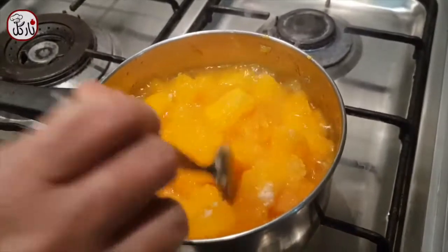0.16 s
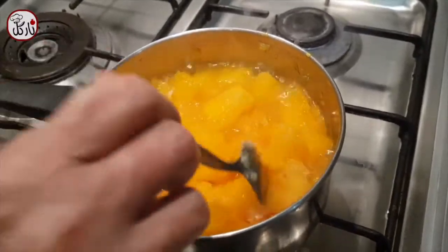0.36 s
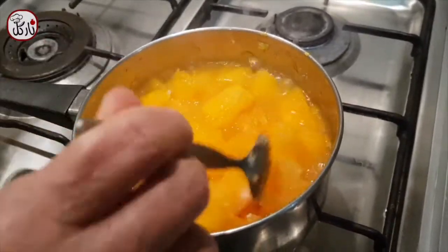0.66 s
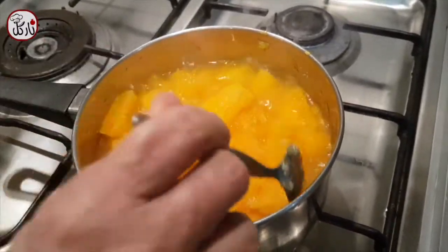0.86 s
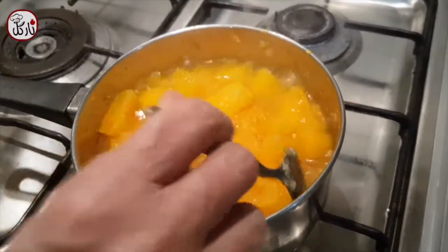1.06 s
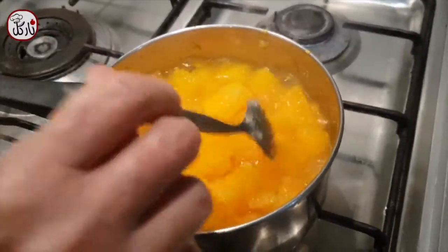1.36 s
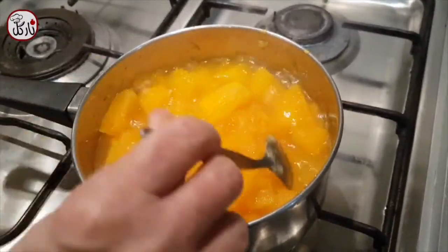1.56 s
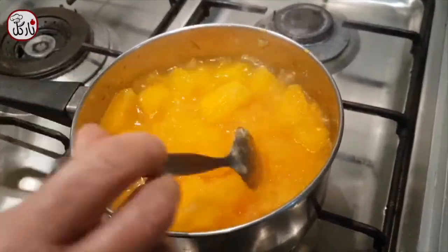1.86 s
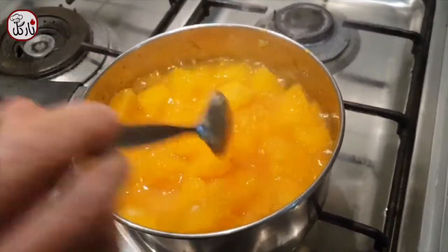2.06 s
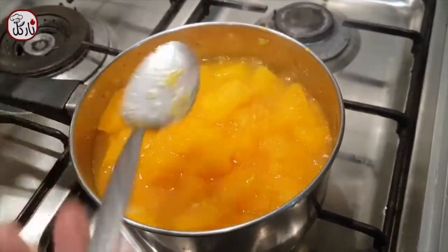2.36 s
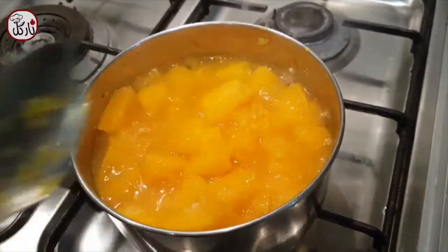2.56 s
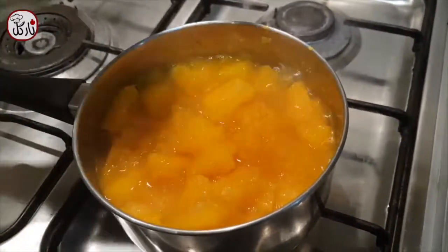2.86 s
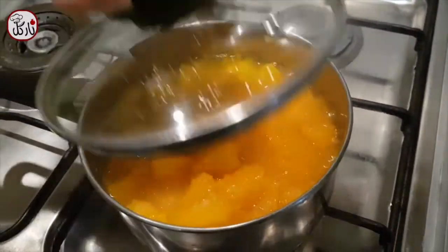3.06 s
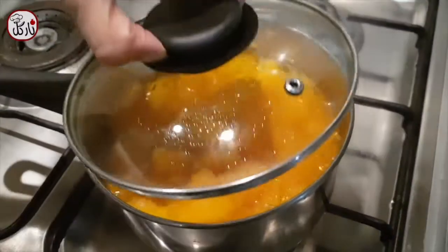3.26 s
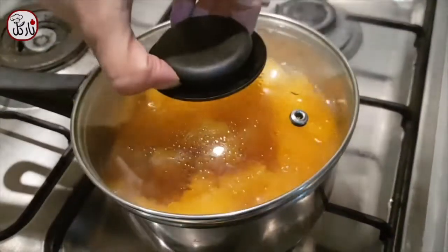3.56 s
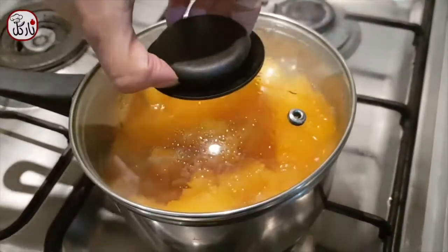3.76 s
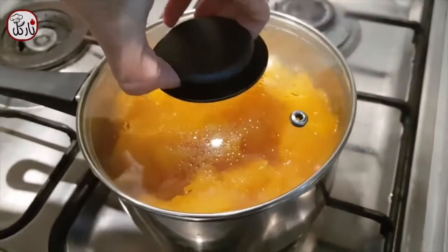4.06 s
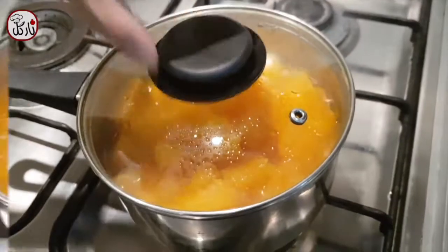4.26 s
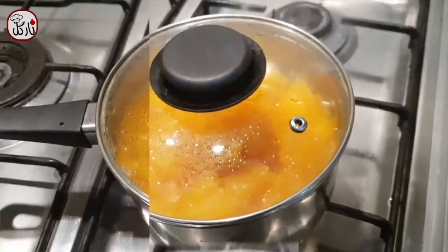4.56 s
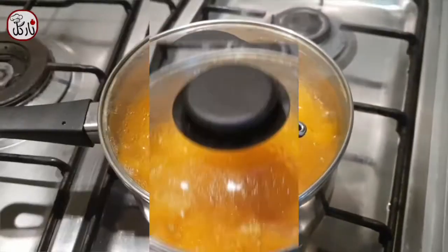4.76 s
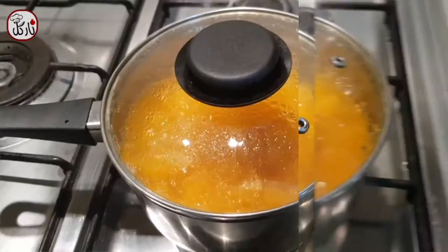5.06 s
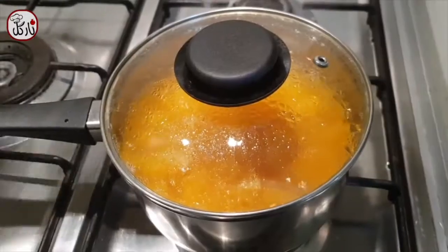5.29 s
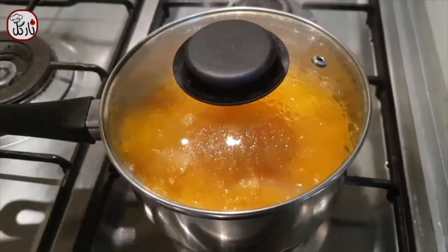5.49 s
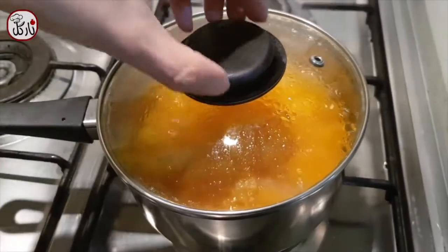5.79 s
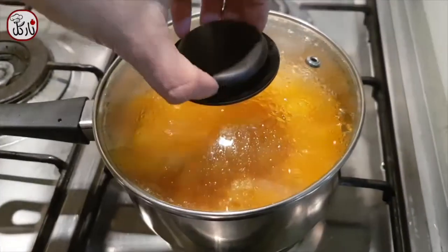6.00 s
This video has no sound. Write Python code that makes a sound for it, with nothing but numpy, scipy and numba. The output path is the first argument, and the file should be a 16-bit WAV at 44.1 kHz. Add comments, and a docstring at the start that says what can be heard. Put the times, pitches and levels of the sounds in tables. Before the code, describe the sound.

Close to a steel pot on a stove, syrup with pumpkin simmers briskly: hollow wet pops, bright spits and fine fizz ring between the metal walls. After three seconds a glass lid comes down, the pot's hollow tone slides lower, and the lid clatters onto the rim and rocks briefly. The boil is then muffled, leaving a low beating motor hum, soft room noise and small ticks under the glass.

```python
"""Bubbles pop, spit and fizz in an open steel pot of simmering syrup with pumpkin; the air in the pot rings along.
A glass lid comes down and this ring sinks in pitch; the lid lands in several touches, rocks and muffles the boil.
Two motors hum and beat over soft room noise; at 4.62 s both dip briefly, then go on with more weight on the left.
Each bubble is a click ringing a short resonance, with a spray of smaller clicks; the lid is struck resonances."""
import sys
import numpy as np
from scipy import signal
from scipy.io import wavfile
from numba import njit

SR = 44100
rng = np.random.default_rng(int(sys.argv[2]) if len(sys.argv) > 2 else 0)


def dump_mix(stems):
    """Bounce the given channels to the path in sys.argv[1] as a 16-bit WAV at rate SR."""
    frames = np.atleast_2d(stems).T  # one column per channel
    limited = np.clip(frames, -1, 1)  # hard clip at full scale
    pcm = np.round(limited * 32767).astype(np.int16)
    wavfile.write(sys.argv[1], SR, pcm)


N = 270465

# Levels are those before the gains, echoes and resonances that follow. Balance is left over right.
COVER_S, COVERED_S, SHUT_S = 3.23, 3.86, 3.88   # the lid begins to cover the pot, covers it, and is shut
LID_NEAR_S = (3.05, 3.22)   # the lid comes near enough to change the ring of the air
SHIFT_S = 4.62   # the background dips and then weighs more on the left
SIDE_LAG = 16   # samples by which high bursts reach the right side later


def amp(db):
    """Turns dB into gain."""
    return 10 ** (np.asarray(db) / 20)


def rms_one(x):
    """Scales a sound to rms 1."""
    return x / np.sqrt(np.mean(x ** 2) + 1e-20)


def in_time(rows):
    """Draws straight lines between table rows: one value per sample for each column."""
    s, *columns = np.transpose(rows)
    return [np.interp(np.arange(N) / SR, s, column) for column in columns]


def at_hz(points, hz):
    """Reads a spectrum table at a frequency, on a log axis."""
    points = np.array(points)
    return np.interp(np.log(hz), np.log(points[:, 0] + 1), points[:, 1])


def sides(pan_db):
    """Left and right gains for a balance in dB."""
    return amp(np.array([pan_db / 2, -pan_db / 2]))


def ramp(start_s, end_s):
    """Rises from 0 to 1 between two moments."""
    return np.clip((np.arange(N) / SR - start_s) / (end_s - start_s), 0, 1)


def butter(x, order, hz, kind="low"):
    """Keeps the part of a sound below, above or between the given frequencies."""
    return signal.sosfilt(signal.butter(order, hz, kind, fs=SR, output="sos"), x)


def drift(cut_hz):
    """Slow random wandering of spread 1: noise smoothed twice, computed at every 40th sample."""
    r = np.exp(-80 * np.pi * cut_hz / SR)
    noise = rng.standard_normal(N // 40 + 2002)
    slow = signal.lfilter([1], [1, -2 * r, r * r], noise)[2000:]
    return np.interp(np.arange(N) / 40, np.arange(len(slow)), rms_one(slow))


def resonate(x, hz, width_hz):
    """A resonance with gain 1 at its peak; the narrower, the longer it rings."""
    r = np.exp(-np.pi * width_hz / SR)
    feedback = [1, -2 * r * np.cos(2 * np.pi * hz / SR), r * r]
    return signal.lfilter((1 - r * r) / 2 * np.array([1, 0, -1]), feedback, x + 1e-18)


def steep(x, hz, width_hz):
    """A resonance passed twice, so that less is left on either side of its pitch."""
    return resonate(resonate(x, hz, width_hz), hz, width_hz)


@njit
def sweep(x, hz, r, rate):
    """A resonance whose pitch moves from sample to sample."""
    y = np.zeros(len(x))
    for i in range(2, len(x)):
        y[i] = x[i] - x[i - 2] + 2 * r * np.cos(2 * np.pi * hz[i] / rate) * y[i - 1] - r * r * y[i - 2]
    return y


def grains(per_s, spread_db, size):
    """Random clicks of uneven size and sign."""
    heights = amp(spread_db * np.minimum(rng.exponential(1, size), 4)) * rng.choice([-1, 1], size)
    return heights * (rng.random(size) < per_s / SR)


# How alike left and right are: f/Hz, likeness (0-1)
SIDE_LIKENESS = [(60, 1), (400, 0.88), (800, 0.17), (1500, 0.043), (5000, 0.064)]


def banded(source, spectrum, balance, patchy_db):
    """Colours noise in third-octave bands, each with its own level, flicker, balance and likeness of sides."""
    out, edges = 0, 25 * 2 ** np.arange(0, 9.4, 1 / 3)
    for k, (low, high) in enumerate(zip(edges, edges[1:])):
        hz = np.sqrt(low * high)
        if hz > spectrum[0][0]:
            mid, side = butter(source[k % 2], 2, [low, high], "band")
            alike = np.clip(at_hz(SIDE_LIKENESS, hz), 0, 1)
            pair = np.sqrt(1 + alike) * mid + np.sqrt(1 - alike) * side * [[1], [-1]]
            level = amp(at_hz(spectrum, hz) + patchy_db * drift(6.6))
            out = out + level * sides(at_hz(balance, hz))[:, None] * pair
    return out


def walls(x, wet_db, t60):
    """Dense echoes between the steel walls, the same on both sides in the bass, different in the treble."""
    noise = rng.standard_normal((3, 5000))
    low, high = (butter(noise, 2, 756, kind) for kind in ("low", "high"))
    tail = (low[2] + high[:2]) * amp(-60 * np.arange(5000) / SR / t60)
    tail = tail / np.sqrt(np.sum(tail[0] ** 2))
    return x + amp(wet_db) * signal.fftconvolve(x, tail, axes=1)[:, :N]


# Further tones of the pot's air under the nearing lid: f at first/Hz, share of the moving tone's fall,
# width/Hz, level/dB
AIR_UNDER_LID = [(1795, 0.44, 92, 13), (2510, 0.18, 38, 4.5), (3560, 1, 110, 1.5)]


def sinking_modes(x):
    """Further air tones fall with the moving tone, each by its share, while that is below 900 Hz."""
    fall_hz, out = np.minimum(in_time(AIR_PITCH)[0] - 900, 0), 0
    for hz, share, width_hz, db in AIR_UNDER_LID:
        r = np.exp(-np.pi * width_hz / SR)
        rings = np.array([sweep(side + 1e-18, hz + share * fall_hz, r, SR) for side in x])
        out = out + amp(db) * (1 - r * r) / 2 * rings
    return out


def wake(events):
    """Gain of the froth: each burst stirs it up for a moment; average 1 until the lid begins to cover the pot."""
    fade_s, share = 0.019, 0.4   # share of the froth that comes with the bursts
    s, db = np.transpose(events)[:2]
    starts = np.zeros(N)
    starts[(s * SR).astype(int)] = np.sqrt(amp(db))
    stirred = signal.lfilter([1], [1, -np.exp(-1 / (fade_s * SR))], starts + 1e-18)
    return 1 - share + share * stirred / stirred[:round(COVER_S * SR)].mean()


def droplets(spray_s, spray_db, per_s, length):
    """Four streams of droplet clicks, left and right, that set in after a moment and fade."""
    rise_s, share_alike = 0.00038, 0.2   # droplets take a moment to fly; share heard alike on both sides
    t = np.arange(length) / SR
    fade = amp(spray_db) * np.exp(-t / spray_s) * (1 - np.exp(-t / rise_s))
    spray = fade * grains(per_s, 3.4, (4, 2, length))
    energy = np.sum(spray ** 2, axis=-1, keepdims=True) + 1e-12
    usual = np.sqrt(1.6 * per_s * spray_s / energy) * amp(spray_db)
    spray = spray * np.clip(usual, .4, 1.6)   # evens out chance differences in strength
    spray[:, 1] = share_alike * np.roll(spray[:, 0], SIDE_LAG, axis=1) + (1 - share_alike) * spray[:, 1]
    return spray


def peak_one(x):
    """Scales a ring so that its first 150 samples peak at 1."""
    return x / np.abs(x[:, :150]).max()


# Fixed tones of the air in the open pot: f/Hz, width/Hz, level/dB
OPEN_POT_AIR = [(837, 57, 4.5), (1110, 127, 2), (1550, 52, 1), (1795, 260, 2), (2266, 43, -1.5),
                (2926, 47, 6.5), (3416, 175, 2.5), (4300, 200, 0.5)]


def bursts(events, spray_db, ring_db, snap_db, air_db, cycles, wet_damps, drops_per_s, drop_cycles):
    """A film snaps, its hollow rings a few cycles, droplets ring around that pitch, and the pot's air answers."""
    length = 5000
    out = np.zeros((2, N + length))
    for s, db, hz, pan_db, spray_s in events:
        spray_s = max(spray_s, .002)
        alike, *drops = droplets(spray_s, spray_db, drops_per_s, length)
        click = np.zeros((2, length))
        # the right side comes later: 9 samples for low bursts, 16 for high ones
        click[[0, 1], [0, 9 if hz < 1300 else SIDE_LAG]] = 1
        # longer spray means a wetter burst, which rings fewer cycles
        width_hz = hz / np.clip(cycles * (.01 / spray_s) ** wet_damps, .8, 12)
        ring = resonate(steep(click, hz, width_hz), hz, 2.95 * width_hz)
        snap_hz = min(hz * 1.24, 13000)   # the broad snap usually lies above the ring
        sound = amp(ring_db) * peak_one(ring) + amp(snap_db) * peak_one(steep(click, snap_hz, snap_hz))
        sound += steep(alike, hz, 1.18 * width_hz) / np.abs(ring).max() * amp(-3.0)
        for drop, ratio in zip(drops, (0.626, 1.3, 2.32)):
            drop_hz = min(hz * ratio * rng.uniform(0.78, 1.17), 11500)
            sound += amp(10.0) * steep(drop, drop_hz, drop_hz / drop_cycles)
        start = round(s * SR)
        out[:, start:start + length] += amp(db) * sides(pan_db)[:, None] * sound
    out, near = out[:, :N], ramp(*LID_NEAR_S)
    open_air = sum(amp(db) * resonate(out * (1 - near), hz, width_hz) for hz, width_hz, db in OPEN_POT_AIR)
    return out + amp(air_db) * (open_air + sinking_modes(out * near))


def bubbles(low_hz, high_hz, per_s, cycles, tilt_db, clump_db, alike):
    """Random bursts dealt to ten pitches, in clumps; part of each reaches both sides alike."""
    out = 0
    for hz, db in zip(np.geomspace(low_hz, high_hz, 10), np.linspace(0, tilt_db, 10)):
        clicks = grains(per_s / 10, 4.5, (2, N)) * amp(clump_db * drift(15))
        clicks[1] = alike * np.roll(clicks[0], 9) + (1 - alike) * clicks[1]
        out = out + amp(db) * rms_one(steep(clicks, hz, hz / cycles))
    return rms_one(out * amp(clump_db * drift(17.8)))


# Colour of the flame and room noise: f/Hz, level per Hz/dB
ROOM_SPECTRUM = [(15, -65), (25, -17.5), (64, -16), (141, -3.5), (194, -12), (269, -8), (710, -21.5),
                 (769, -22.5), (981, -21), (1870, -27), (2660, -45), (7420, -44), (8730, -46.5),
                 (10300, -55), (15800, -89)]
# Extra balance of that noise: f/Hz, level left over right/dB
ROOM_SIDES = [(60, -1.5), (600, -4.5), (1500, -6.5), (3000, -26.5), (6000, -7.5), (12000, 15)]


def room():
    """The flame and the kitchen: soft noise, strongest in the bass, with two resonances of the pot."""
    pan_db = 4.5 + (10 - 4.5) * ramp(SHIFT_S - .3, SHIFT_S)
    noise = rms_one(banded(rng.standard_normal((2, 2, N)), ROOM_SPECTRUM, ROOM_SIDES, patchy_db=1.2))
    body = sum(amp(db) * rms_one(resonate(rng.standard_normal(N), hz, width_hz))
               for hz, width_hz, db in POT_BODY[:2])
    return amp(-56) * sides(pan_db) * (noise + amp(-10.5) * body)


def hum():
    """Tones at 2 and 3 times one motor's speed; the other motor's tone beats with the third ten times a second."""
    motor_hz, other_hz = 44.83, 144.65
    in_step_s = (.011, 5.406)   # moments when all tones start a cycle together, before and after the dip
    shifted = ramp(SHIFT_S - .05, SHIFT_S + .05)
    before_after = np.array([1 - shifted, shifted])
    t = np.arange(N) / SR - np.array(in_step_s)[:, None]
    out = 0
    for db, hz in ((-57, 2 * motor_hz), (-56.5, 3 * motor_hz), (-55, other_hz)):
        tone = np.sum(before_after * np.sin(2 * np.pi * hz * t), axis=0)
        out = out + np.sqrt(2) * amp(db + 0.15 * drift(9.6)) * tone
    return sides(1.5 + (7 - 1.5) * shifted) * out


# Gain of the background, with a brief dip at 4.62 s: t/s, level/dB
BACKGROUND_LEVEL = [(0, -3.5), (1.3, 0.5), (2.2, -2), (3.5, 1.5), (4.0, -5.5), (4.35, -4.5), (4.62, -10),
                    (4.9, -4.5), (5.15, -3.5), (5.6, -4), (6.13, -4)]


def background():
    """Hum and room noise; at 4.62 s they dip briefly, then go on with more weight on the left."""
    level_db, = in_time(BACKGROUND_LEVEL)
    return amp(level_db) * (hum() + room())


# Bands of the faint hiss: f/Hz, width/Hz, level/dB
HISS_BANDS = [(7400, 900, 0), (10400, 1000, 1), (13000, 3000, -5), (5200, 1800, -4)]


def hiss():
    """A faint, sputtering hiss of dense clicks in four bands, mostly on the left."""
    bands = 0
    for hz, width_hz, db in HISS_BANDS:
        band = rms_one(steep(grains(3100, 2.8, (2, N)), hz, width_hz))
        bands = bands + amp(db + 2.0 * drift(47)) * band
    return ramp(4.0, 4.6) ** 2 * amp(-92 + 4.3 * drift(21.0)) * sides(13.0)[:, None] * bands


# Drops ticking against the shut lid: t/s, level/dB, f/Hz, level left over right/dB, spray fade/s
LID_TICKS = [(4.4962, -61, 7640, 4.5, 0.0046), (4.6019, -69.5, 3520, 9, 0.0057),
             (4.6269, -63.5, 7300, 21, 0.0091), (4.7047, -66.5, 6100, 20, 0.0058),
             (4.8758, -51, 7700, 21.5, 0.0069), (5.0559, -60, 7500, 14, 0.0037),
             (5.1557, -67, 4220, 12, 0.0058), (5.3063, -63, 8240, 22, 0.004),
             (5.3856, -54.5, 4870, 7, 0.008), (5.4101, -56.5, 5440, 7, 0.03),
             (5.5428, -63.5, 7000, 14, 0.0079), (5.6705, -62, 7500, 16, 0.0054),
             (5.7309, -61, 7600, 14, 0.006), (5.7664, -57, 7140, 26, 0.0044),
             (5.9, -57.5, 7350, 18, 0.0069), (5.9873, -60, 4630, 9, 0.0067), (6.0272, -55, 6800, 21, 0.011)]
# Bubbles muffled under the shut lid: t/s, level/dB, f/Hz, level left over right/dB, spray fade/s
MUFFLED_BUBBLES = [(4.6014, -68, 1510, 3, 0.0028), (4.6702, -65, 1880, 6, 0.0043),
                   (4.8558, -61, 1740, 12, .004), (4.893, -66, 3500, 7, 0.012),
                   (4.9281, -64, 1700, 7, .004), (4.929, -61, 4960, 10, .003), (4.982, -67, 2200, -3, .003),
                   (5.046, -67, 1170, 10, .004), (5.198, -62.5, 5040, 10, .008),
                   (5.7657, -65, 1800, 7, .003), (5.8605, -60.5, 2120, 21, 0.011),
                   (5.9314, -56, 3050, 7, 0.0067), (5.9862, -61, 2130, 9, 0.0036)]


def under_lid():
    """Drops tick on the glass and single bubbles burst below; the lid dulls both."""
    out = bursts(LID_TICKS, spray_db=-4.5, ring_db=-1.0, snap_db=-13.0, air_db=-24,
                 cycles=2.9, wet_damps=1.0, drops_per_s=800, drop_cycles=2.3)
    out += bursts(MUFFLED_BUBBLES, spray_db=-2.5, ring_db=-4.0, snap_db=-22.0, air_db=-28,
                  cycles=7.2, wet_damps=0.094, drops_per_s=500, drop_cycles=2.0)
    return butter(out, 2, 7400)


# The hand lets go and the lid rocks: t/s, level/dB, softness (0-1)
ROCKING_TOUCHES = [(4.2312, -36.5, 0), (4.246, -37, 0.65), (4.2527, -34, .8), (4.262, -41, 0.68),
                   (4.2822, -33, 0.63), (4.3042, -21, 0.85), (4.324, -30, 0.85), (4.351, -37, 0.84),
                   (4.371, -46, 0.84)]
# Tones of the seated lid: f/Hz, width/Hz, level/dB
SEATED_LID = [(1924, 69, 5), (2203, 140, 8.5), (2340, 104, 8), (3890, 75, -2), (4600, 70, -4),
              (7400, 130, -19), (11300, 490, -7)]


def rocking():
    """Each touch is a click and a short chatter that rings the seated lid; soft touches are duller."""
    touch = np.zeros((2, N))
    for s, db, soft in ROCKING_TOUCHES:
        start = round(s * SR)
        chatter = amp(-20) * np.exp(-np.arange(2000) / SR / .012) * grains(1800, 2.5, (2, 2000))
        chatter[:, 0] += 1
        dulled = signal.lfilter([(1 - soft) ** 2], [1, -2 * soft, soft ** 2], chatter)
        touch[:, start:start + 2000] += amp(db) * dulled
    rings = sum(amp(db) * resonate(resonate(touch, hz, width_hz), hz, 2.4 * width_hz)
                for hz, width_hz, db in SEATED_LID)
    return amp(23.5) * sides(9.1)[:, None] * rings


# A very faint onset (first row), then the touches of the lid landing on the rim from 3.8756 s:
# t/s, click level/dB, clatter level/dB, clatter treble level/dB, thud level/dB
LANDING_ONSETS = [(3.867, -43, -52, -50.5, -66.5), (3.8756, -35.5, -28, -42.5, -47.5),
                  (3.9018, -26, -27, -38, -33.5), (3.911, -32, -37, -43, -43),
                  (3.9169, -24.5, -26.5, -40.5, -31.5), (3.9278, -11.5, -25, -52.5, -34.5),
                  (3.9315, -12, -32, -35, -33.5), (3.937, -23.5, -28.5, -50.5, -44.5),
                  (3.944, -28, -35, -51, -34.5), (3.957, -24, -37, -44.5, -48.5)]


def after_onsets(levels_db, tail_t60):
    """Loudness curve: each onset rises fast, dies fast and leaves a slower tail; powers add."""
    attack_s, onset_t60, tail_db = 0.0034, 0.033, -4   # t60: seconds to fall by 60 dB
    age = np.maximum(np.arange(N) / SR - np.array(LANDING_ONSETS)[:, :1], 0)
    fades = amp(-60 * age / onset_t60) + amp(tail_db - 60 * age / tail_t60)
    shape = (1 - np.exp(-age / attack_s)) * fades
    return np.sqrt(np.sum((amp(levels_db)[:, None] * shape) ** 2, axis=0))


# Tones of the lid and rim: f/Hz, width/Hz (knocks widen it), level/dB
LID_RIM = [(916, 45, -2.5), (1208, 110, 0), (1555, 62, -3), (1973, 36, 3), (2105, 45, 0.5),
           (3480, 47, -7.5), (4070, 58, -1.5), (4430, 62, 4), (4450, 240, -2.5), (5830, 62, -16),
           (7200, 110, -25.5), (10540, 270, -10), (11100, 190, -22)]


def knocks():
    """The click at each onset of the landing rings the lid briefly."""
    click = np.zeros((2, N))
    for s, db, *_ in LANDING_ONSETS:
        click[[0, 1], round(s * SR) + np.array([0, 12])] = amp(db)
    click = signal.lfilter([.4], [1, -.6], click)   # rim on rim is not quite sharp
    return amp(17.0) * sum(amp(db) * resonate(click, hz, 3.2 * width_hz) for hz, width_hz, db in LID_RIM)


# Colour of the broad clatter: f/Hz, level per Hz/dB
CLATTER_SPECTRUM = [(290, -50), (500, -0.5), (781, -12), (1220, 7.5), (1370, -7), (2160, 3.5), (3010, -6),
                    (4440, -2.5), (5510, -11), (10700, -14.5), (15500, -41)]
# Low tones of the pot's body (the room noise uses the first two): f/Hz, width/Hz, level/dB
POT_BODY = [(241, 48, 5), (274.5, 8.6, 3), (151, 74, -5), (349, 150, 0)]


def landing():
    """Dense contacts along the rim ring the lid, clatter, and thud in the pot's body; the treble dies first."""
    clatter_db, treble_db, thud_db = np.transpose(LANDING_ONSETS)[2:]
    part = slice(round(3.8 * SR), round(4.3 * SR))
    length = part.stop - part.start

    def level(x):
        """Scales to rms 1 within the landing."""
        return x / np.sqrt(np.mean(x[..., part] ** 2))

    contacts = np.zeros((2, 2, N))
    contacts[..., part] = grains(1600, 3.8, (2, 2, length))
    grinding = np.zeros(N)
    grinding[part] = grains(4000, 2.5, length)
    rings = sum(amp(db) * rms_one(resonate(contacts[0], hz, width_hz)) for hz, width_hz, db in LID_RIM)
    balance = [(500, 5.5), (2000, 0.5), (5000, 0.5), (10000, 8.8)]   # f/Hz, level left over right/dB
    broad = banded(contacts, CLATTER_SPECTRUM, balance, patchy_db=1.5)
    clatter = 0.54 * sides(-16)[:, None] * level(rings) + 0.9 * level(broad)
    low, high = (level(butter(clatter, 6, 5300, kind)) for kind in ("low", "high"))
    thud = sum(amp(db) * rms_one(resonate(grinding, hz, width_hz)) for hz, width_hz, db in POT_BODY)
    return (after_onsets(clatter_db, tail_t60=0.26) * low
            + after_onsets(treble_db, tail_t60=0.16) * high
            + after_onsets(thud_db, tail_t60=0.19) * level(thud))


# Moving tone of the air in the pot; it wanders around 1 kHz, then sinks as the lid closes: t/s, f/Hz, level/dB
AIR_PITCH = [(0, 1030, -93), (.7, 1115, -58), (1.5, 970, -71), (2.3, 1060, -53.5), (2.9, 1020, -57.5),
             (3.18, 887, -53), (3.35, 717, -43.5), (3.395, 666, -63), (3.42, 566, -37.5), (3.5, 530, -45.5),
             (3.54, 474, -50.5), (3.6, 430, -54), (3.68, 410, -55), (3.85, 393, -56)]


def pot_air():
    """Soft plops ring the moving tone of the air in the pot and, as the lid nears, further tones above it."""
    hz, db = in_time(AIR_PITCH)
    near, closing = ramp(*LID_NEAR_S), 1 - ramp(SHUT_S - .05, SHUT_S)
    # the plops come much denser as the lid nears, so the sinking tone sounds continuous
    per_s = 46 + (800 - 46) * near
    r = np.exp(-np.pi * 115 / SR)   # 115 Hz wide, then three times as wide

    def twice(plops):
        """Passes the plops through the moving resonance twice."""
        once = sweep(plops / np.sqrt(per_s), hz, r, SR)
        return rms_one(sweep(once, hz, r ** 3, SR))

    mid = twice(grains(per_s, 3.0, N))
    other = twice(grains(per_s, 0.82, N))
    upper = rms_one(sinking_modes(grains(per_s, 3.3, (2, N)) * near))
    right = 0.51 * np.roll(mid, 8) + 0.24 * other
    moving = amp(db) * (near + (1 - near) * wake(SYRUP_POPS)) * np.array([amp(1.0) * mid, amp(3.0) * right])
    return closing * (moving + amp(-62.5 - 13.4 * ramp(COVER_S, COVERED_S)) * upper)


# Vigour of the froth: t/s, level/dB
FROTH_VIGOUR = [(0.05, -56.5), (0.34, -65.5), (0.6, -54), (0.91, -66), (1.35, -54), (2.07, -57), (2.7, -62),
                (3.1, -55), (3.4, -64.5)]


def froth():
    """Large bubbles murmur, small ones gurgle, the tiniest fizz, until the shut lid muffles them all."""
    vigour_db, = in_time(FROTH_VIGOUR)
    mean_db = vigour_db.mean()
    # as the lid covers the pot, the murmur sinks, the gurgle barely, and the fizz gains a little
    cover_db = np.outer((-14, -1, 2), ramp(COVER_S, COVERED_S))
    surge_db = vigour_db + 2.5 * drift(9)   # gurgle and fizz swell together
    murmur_db = cover_db[0] - 0.5 + mean_db + 0.51 * (vigour_db - mean_db)   # about half the swing
    gurgle_db = cover_db[1] + 1.5 + surge_db
    fizz_db = cover_db[2] - 13 + surge_db

    large = bubbles(259, 989, 900, 3.5, tilt_db=12.5, clump_db=2.0, alike=1.0)
    small = bubbles(1150, 4420, 1200, 4.9, tilt_db=-4.5, clump_db=5.0, alike=0.023)
    tiny = bubbles(6130, 13100, 1700, 11.0, tilt_db=-7.0, clump_db=8.5, alike=0.128)
    murmur = amp(murmur_db) * sides(4.0)[:, None] * large
    gurgle = amp(gurgle_db) * wake(SYRUP_POPS) * sides(1.3)[:, None] * small
    fizz = amp(fizz_db) * wake(SYRUP_SPITS) * sides(9.9)[:, None] * tiny
    shut = amp(-32 * ramp(SHUT_S - .05, SHUT_S))

    # large bubbles heard through the shut pot
    muffled = rms_one(butter(large, 2, 290))
    muffled = amp(-68) * sides(8.2)[:, None] * ramp(SHIFT_S, SHIFT_S + 0.22) * muffled
    return muffled + walls((murmur + gurgle + fizz) * shut, wet_db=-0.5, t60=0.043)


# Bright spits of syrup: t/s, level/dB, f/Hz, level left over right/dB, spray fade/s
SYRUP_SPITS = [(0.0044, -46.5, 5930, 12.5, 0.018), (0.0726, -51.5, 9700, 21, 0.004),
               (0.1341, -34.5, 8250, -5, 0.0075), (0.2335, -41.5, 6800, 6, 0.0024),
               (0.3144, -54.5, 6800, 14, 0.053), (0.373, -37, 6400, 9, 0.016), (0.49, -48, 6400, 9, 0.016),
               (0.597, -39, 6270, 13, 0.0057), (0.6814, -34, 6880, 12.5, 0.0058),
               (0.7796, -51.5, 12900, 17, 0.1), (0.8673, -39, 7600, -3, 0.02),
               (0.9158, -31.5, 8100, 6.5, 0.013), (0.9804, -41, 5230, 8.5, 0.015),
               (1.0463, -41, 5170, 6, 0.0079), (1.093, -42.5, 7360, 2, 0.002),
               (1.1298, -41, 5460, 1, 0.012), (1.166, -41.5, 7500, 4, 0.026),
               (1.2291, -46, 12400, 15, 0.0068), (1.2705, -41, 5000, 19, 0.012),
               (1.35, -48.5, 6800, -4, 0.01), (1.4033, -34.5, 5200, 6, 0.02), (1.595, -48, 5440, 16, 0.004),
               (1.673, -35.5, 11000, 7, 0.0047), (1.768, -54, 10800, 6, 0.0027),
               (1.4494, -43, 10600, 0, 0.05), (1.486, -42, 5300, 13, 0.02),
               (1.5235, -47, 10660, 14, 0.0021), (1.5758, -38, 7200, 4, 0.014),
               (1.6195, -33.5, 6840, 2, 0.0071), (1.65, -35, 7460, 16, 0.01),
               (1.723, -31.5, 7340, 0, 0.022), (1.8177, -40.5, 13300, 11, 0.021),
               (1.845, -44.5, 6200, 10, 0.0066), (1.854, -55, 10200, 12, .004),
               (1.9065, -41, 7450, 7, 0.0066), (2.0093, -41, 9600, 7, 0.0078),
               (2.0662, -36, 8000, -7, 0.0074), (2.0827, -27.5, 4200, 0, 0.011),
               (2.1067, -43, 6850, 20, 0.0071), (2.1855, -40.5, 8200, 4, 0.015),
               (2.2204, -38.5, 6550, 8, 0.0057), (2.2867, -36.5, 6700, 6, 0.048),
               (2.4654, -38, 6960, 7, 0.024), (2.5498, -40, 6100, 10.5, 0.017),
               (2.753, -37.5, 6840, 3, 0.011), (2.832, -33.5, 7200, 0, 0.011), (2.8508, -37, 9800, 0, 0.01),
               (2.8985, -35.5, 9500, 8.5, 0.0099), (2.9407, -40, 5300, 6, 0.019),
               (3.047, -33, 5500, 0, 0.017), (3.0943, -41, 10600, 1, 0.037),
               (3.1462, -42.5, 6500, 3, 0.004), (3.2927, -40, 5950, 4, 0.026),
               (3.3682, -45, 11200, 16, 0.0028), (3.4106, -31.5, 6260, 5, 0.015),
               (3.45, -35.5, 6540, 0, 0.02), (3.5016, -40, 5500, 11, 0.0087),
               (3.666, -47.5, 6900, 8, 0.0065)]


def spits():
    """Bright bursts with a weaker snap and louder spray, echoing between the walls."""
    out = bursts(SYRUP_SPITS, spray_db=-6.5, ring_db=-2.5, snap_db=-19.0, air_db=10.0,
                 cycles=3.1, wet_damps=0.96, drops_per_s=400, drop_cycles=4.8)
    return walls(out, wet_db=-2.5, t60=0.025)


# Bubbles bursting: t/s, level/dB, f/Hz, level left over right/dB, spray fade/s
SYRUP_POPS = [(0.059, -38, 985, 11, 0.01), (0.101, -33, 1010, 6, 0.0041), (0.217, -45, 1170, 8, 0.01),
              (0.2765, -36, 2680, 8, 0.013), (0.299, -41, 2260, 4, 0.023), (0.312, -35, 2600, 13, 0.0094),
              (0.382, -32.5, 1400, 7.5, 0.012), (0.406, -38, 3130, -0.5, 0.038),
              (0.458, -37.5, 1840, -1, 0.012), (0.534, -41, 1880, 4.5, 0.0071),
              (0.603, -41.5, 2440, 16, 0.0059), (0.633, -40, 3300, 13, 0.0024),
              (0.646, -32.5, 1900, 2, 0.023), (0.7168, -33, 2700, 5.5, 0.0093),
              (0.741, -43.5, 1350, 9, 0.0061), (0.815, -36.5, 2600, 4, 0.024),
              (0.845, -39.5, 1210, 11, 0.0087), (0.918, -40.5, 1200, 13.5, 0.011),
              (1.018, -55, 1050, 29, 0.002), (1.047, -42.5, 2870, 3, 0.0025), (1.076, -43, 990, 5, 0.034),
              (1.153, -38.5, 1250, 3, 0.037), (1.269, -24, 4400, -8.5, 0.0035),
              (1.377, -37, 1120, 5.5, 0.029), (1.4117, -38.5, 2300, 3, 0.0045),
              (1.477, -35, 2010, 10, 0.018), (1.61, -32, 3830, -2.5, 0.034), (1.669, -38, 2600, 8, 0.0045),
              (1.736, -38, 2140, -7, 0.008), (1.818, -41, 1140, -2, 0.02),
              (1.87, -45.5, 1080, 16.5, 0.0052), (1.906, -33, 2110, 1, 0.01),
              (1.98, -35.5, 4180, 7.5, 0.0075), (2.0, -36.5, 2470, 8, 0.0059),
              (2.073, -30.5, 2270, 4, 0.025), (2.083, -28.5, 1270, 2, 0.011),
              (2.23, -32.5, 3020, 8.5, 0.0016), (2.425, -44.5, 1110, 11.5, 0.025),
              (2.458, -31.5, 1690, -1.5, 0.025), (2.482, -43.5, 1210, 8, 0.0099),
              (2.541, -45.5, 1080, 6, 0.025), (2.591, -38, 2320, 15, 0.014), (2.67, -41.5, 1090, 4, 0.0046),
              (2.7375, -32, 960, 1.5, 0.0083), (2.803, -26, 1250, 3, 0.024), (2.928, -37, 1690, 8, 0.053),
              (2.965, -39.5, 910, 12.5, 0.015), (3.047, -30, 3390, 10.5, 0.0055),
              (3.072, -47, 920, 18, 0.0036), (3.13, -40, 990, 5, 0.0094), (3.18, -47.5, 775, 14, 0.025),
              (3.196, -38, 910, 21.5, 0.0019), (3.241, -46, 860, 10, 0.0079), (3.32, -58, 750, -12, 0.011),
              (3.409, -35, 564, -8, 0.004), (3.447, -30, 556, -9, 0.013), (0.0737, -27, 3950, -6, 0.014),
              (0.2279, -44, 2540, 15, 0.015), (2.9891, -39, 1680, -1, 0.0077),
              (3.241, -40, 1860, 10.5, 0.0051), (3.2415, -28.5, 3280, 5.5, 0.0073),
              (3.195, -54, 2560, 16, 0.0071), (3.45, -47, 3070, -13, 0.067), (3.05, -41.5, 905, 12, 0.006),
              (3.325, -46, 1620, 10.5, .008), (3.447, -36, 1800, 2, 0.026), (3.448, -40, 1090, 3, 0.0024),
              (3.568, -41, 457, 0, .005), (3.6, -40.5, 474, 4.5, 0.0047), (3.3204, -37.5, 2430, 10, 0.013),
              (3.3692, -47.5, 3280, 13, 0.0028), (0.305, -34, 1820, 0, 0.015), (0.362, -50, 930, 8, 0.0088),
              (0.37, -42.5, 1050, 8, 0.0033), (0.585, -36.5, 3720, 0, 0.012),
              (0.705, -40.5, 1010, 4, 0.021), (0.668, -40.5, 1040, 6, 0.026),
              (0.826, -36.5, 1830, -3, 0.007), (0.851, -40.5, 3730, 4, 0.0047),
              (0.934, -44, 910, -1, 0.0041), (1.2635, -38, 2440, 12.5, 0.022),
              (1.2994, -44, 2940, 1, 0.0077), (1.3748, -41.5, 2580, 5, 0.036),
              (1.478, -40.5, 272, 6, 0.0056), (1.49, -28.5, 3730, -1, 0.017), (1.595, -47, 870, 12, 0.0094),
              (1.648, -44, 4550, -3, 0.007), (1.68, -39, 1780, -6, 0.0045),
              (2.2862, -50.5, 2780, 12, 0.0085), (2.3336, -44, 2950, 1, 0.027),
              (2.4399, -50.5, 3120, 3, 0.0086), (2.5745, -41.5, 3020, 11, 0.02),
              (2.832, -44, 2130, -16, 0.0069), (2.8993, -39.5, 3270, 4, 0.016)]


def pops():
    """Deeper bubbles burst with a stronger snap, echoing between the walls."""
    out = bursts(SYRUP_POPS, spray_db=-12.0, ring_db=-3.0, snap_db=-7.5, air_db=1.0,
                 cycles=3.08, wet_damps=0.31, drops_per_s=750, drop_cycles=1.85)
    return walls(out, wet_db=-6.0, t60=0.019)


def scene():
    """Adds all sources, from the background to the bubbles."""
    lid = under_lid() + rocking() + knocks() + landing()
    boil = pot_air() + froth() + spits() + pops()
    return background() + hiss() + lid + boil


def record(dry):
    """The deep bass is weak, the treble has a dip and leans to the left, the top is cut."""
    low = butter(dry, 1, 9600)
    dry = low + (dry - low) * sides(3.5)[:, None]
    dry = dry - 0.71 * resonate(dry, 8620, 610)
    dry = butter(dry, 2, 50, "high")
    return signal.sosfilt(signal.cheby2(14, 60, 16171, fs=SR, output="sos"), dry)   # 60 dB down from 16171 Hz


dry = scene()
out = record(dry)
dump_mix(out)
```